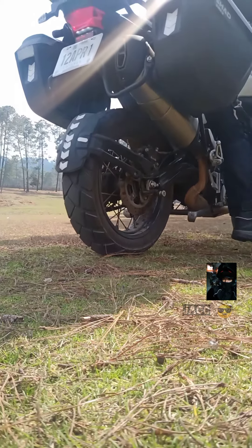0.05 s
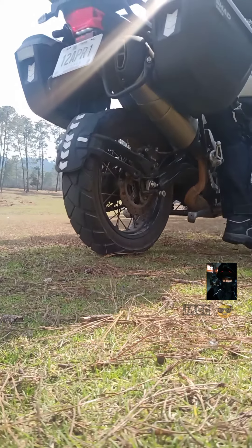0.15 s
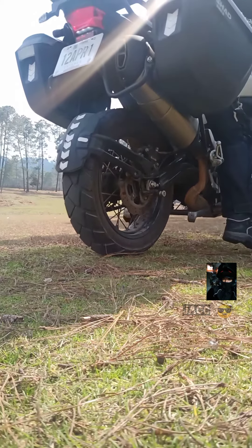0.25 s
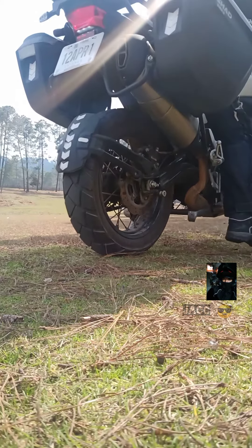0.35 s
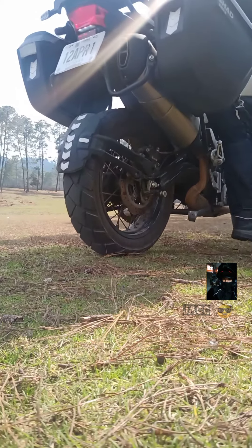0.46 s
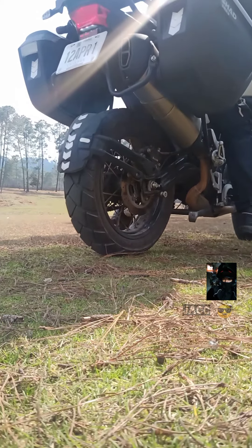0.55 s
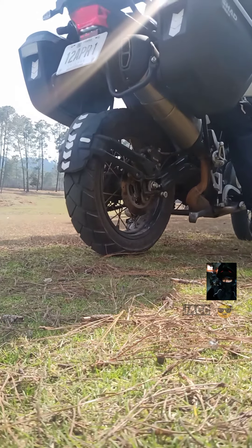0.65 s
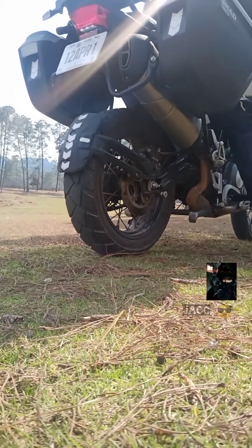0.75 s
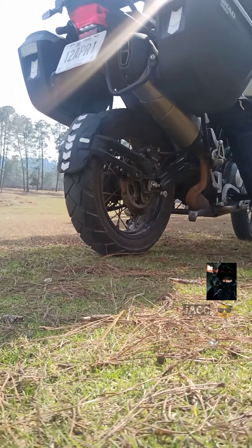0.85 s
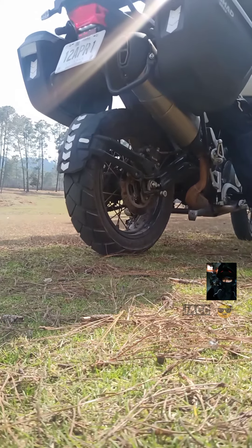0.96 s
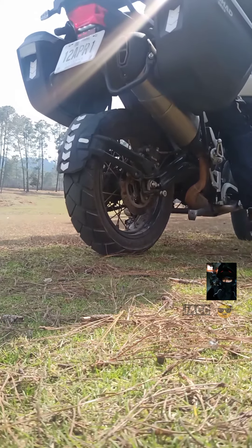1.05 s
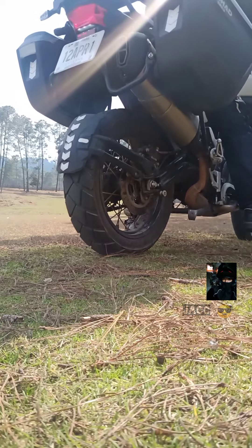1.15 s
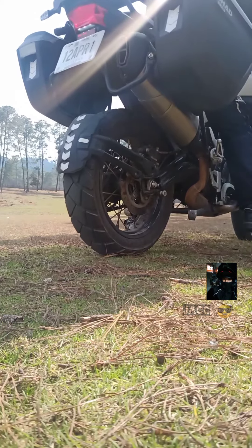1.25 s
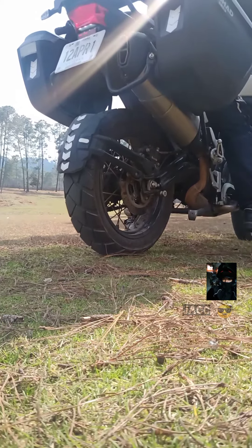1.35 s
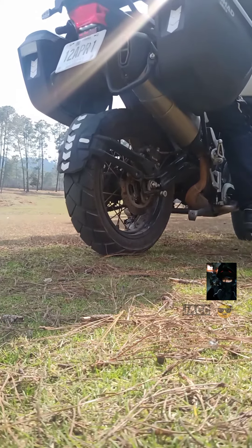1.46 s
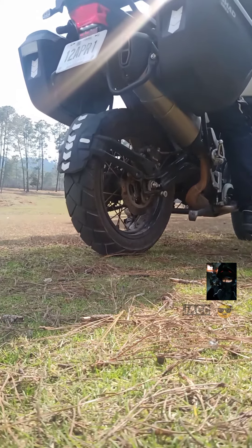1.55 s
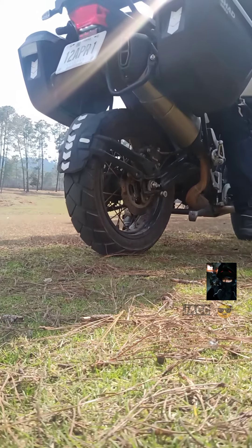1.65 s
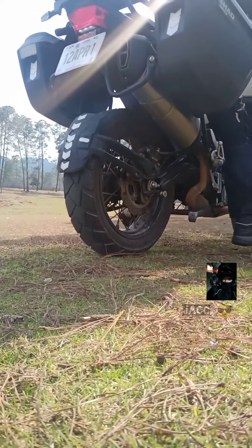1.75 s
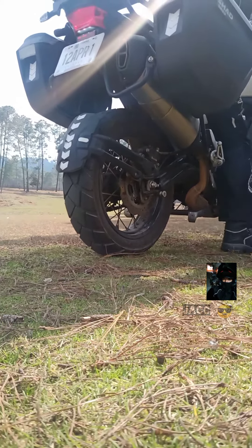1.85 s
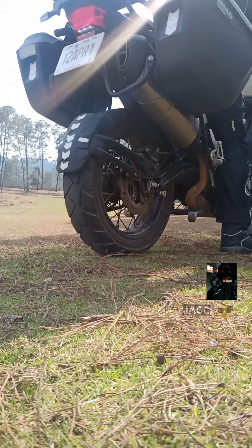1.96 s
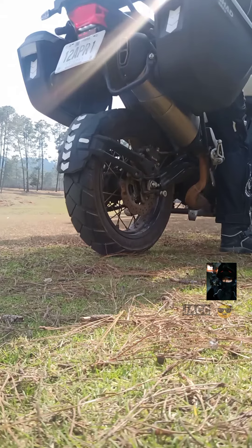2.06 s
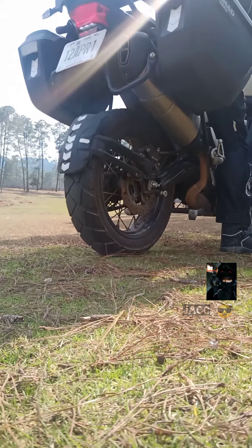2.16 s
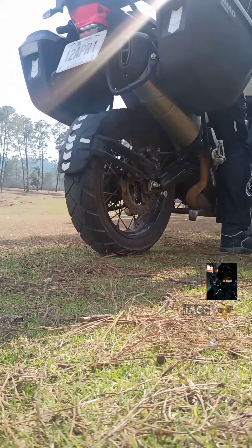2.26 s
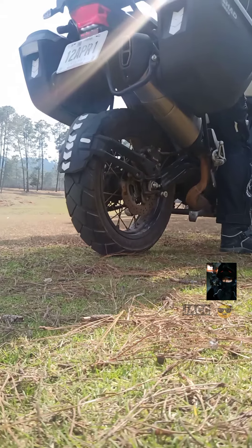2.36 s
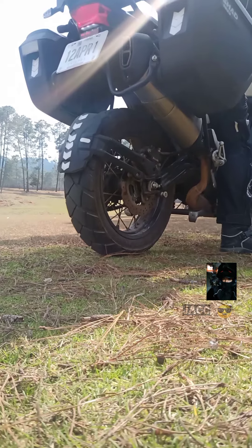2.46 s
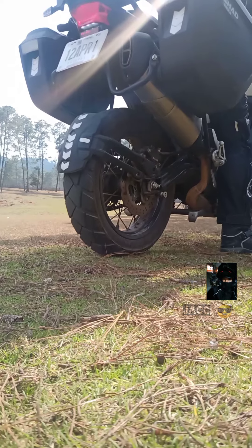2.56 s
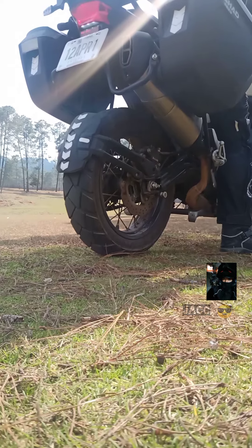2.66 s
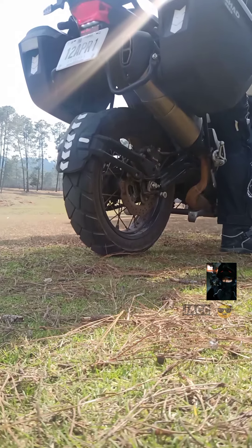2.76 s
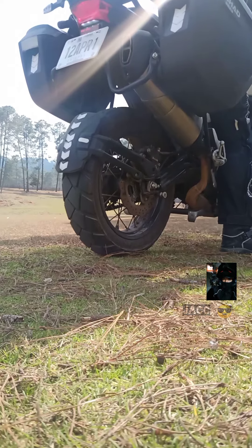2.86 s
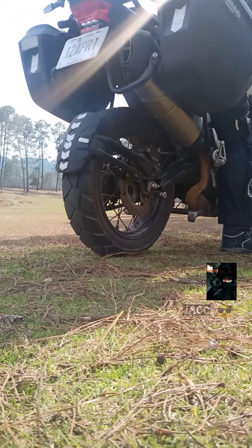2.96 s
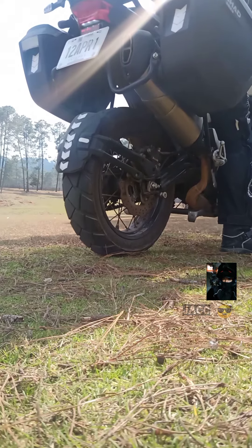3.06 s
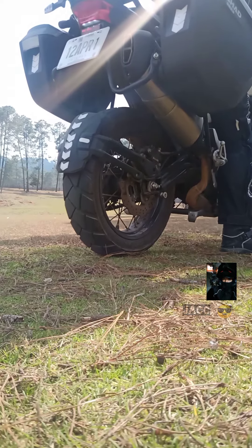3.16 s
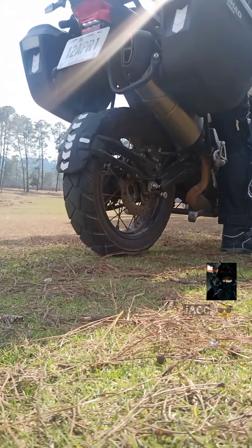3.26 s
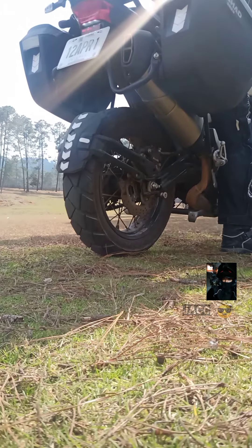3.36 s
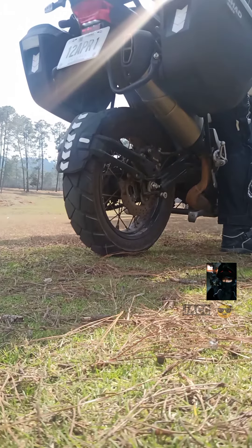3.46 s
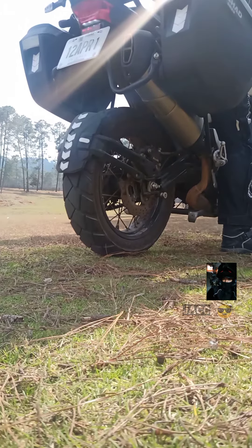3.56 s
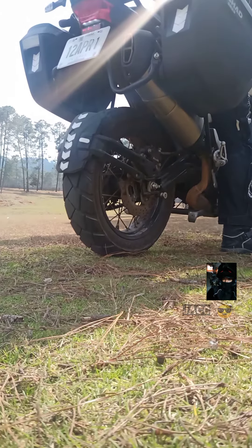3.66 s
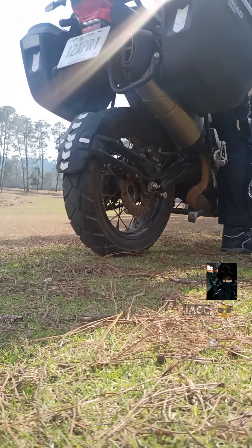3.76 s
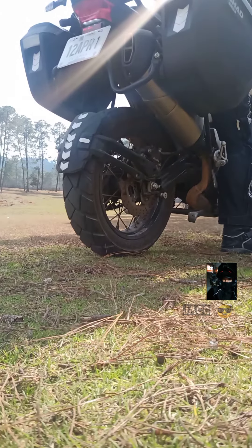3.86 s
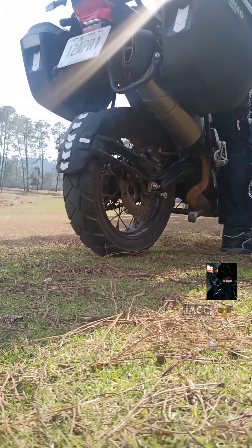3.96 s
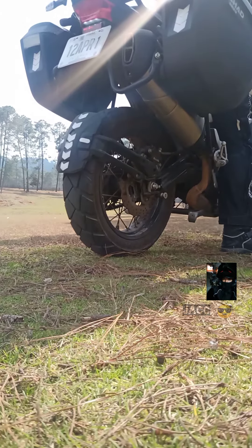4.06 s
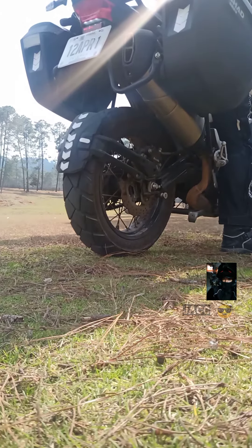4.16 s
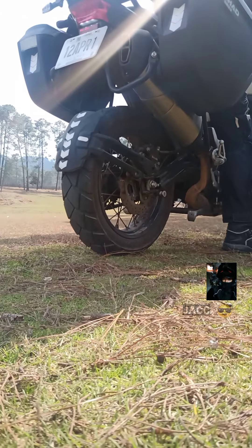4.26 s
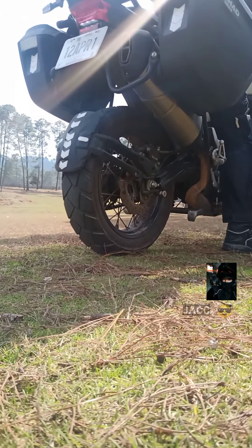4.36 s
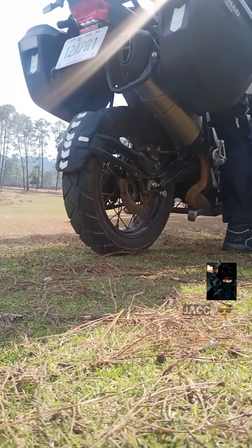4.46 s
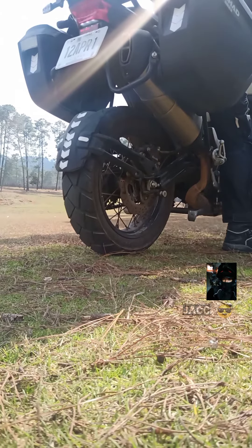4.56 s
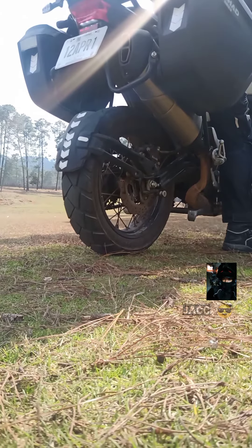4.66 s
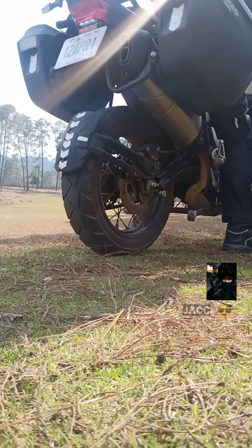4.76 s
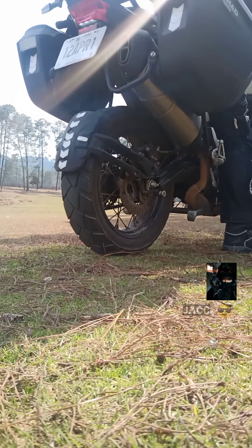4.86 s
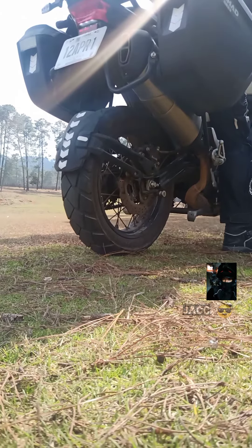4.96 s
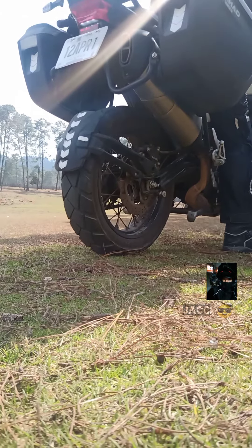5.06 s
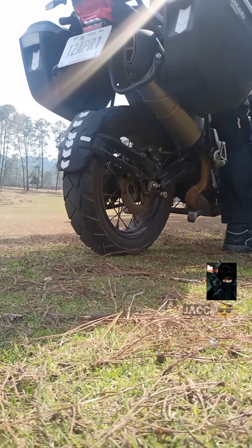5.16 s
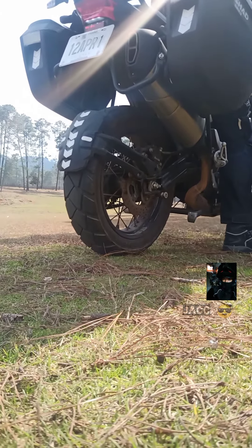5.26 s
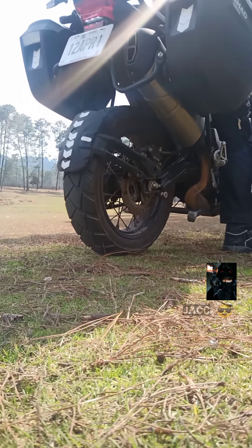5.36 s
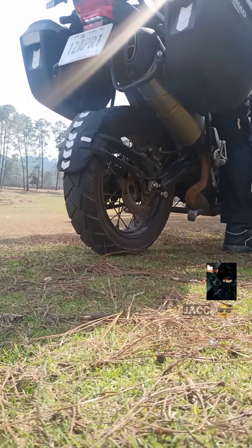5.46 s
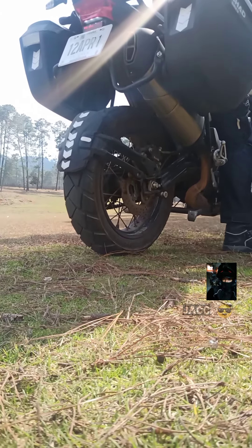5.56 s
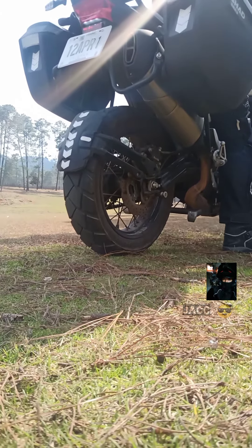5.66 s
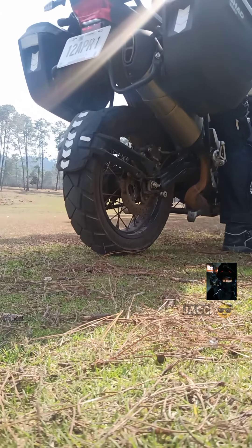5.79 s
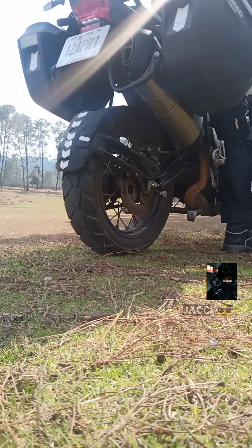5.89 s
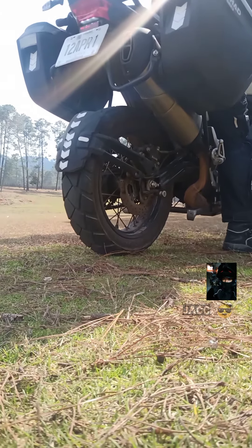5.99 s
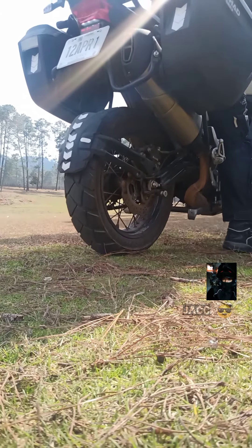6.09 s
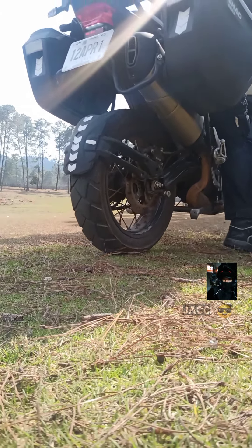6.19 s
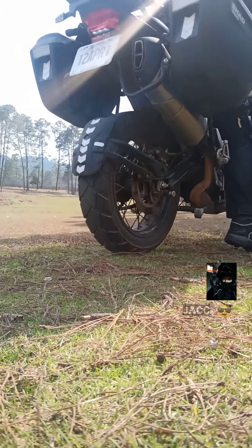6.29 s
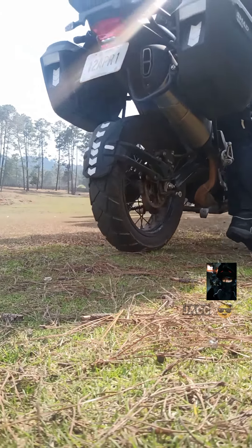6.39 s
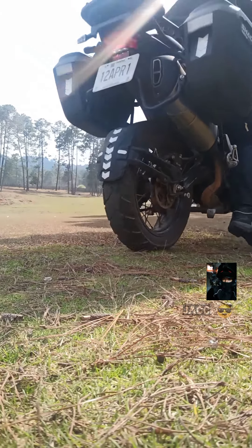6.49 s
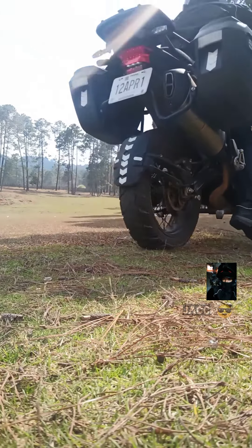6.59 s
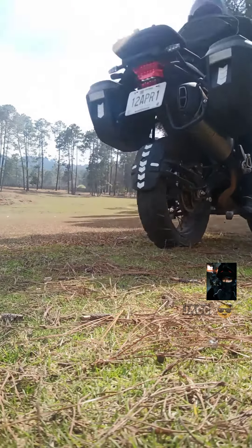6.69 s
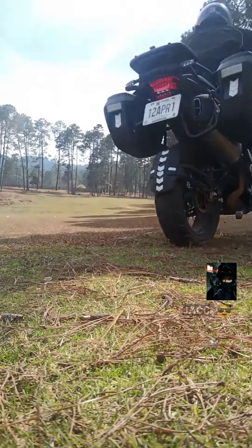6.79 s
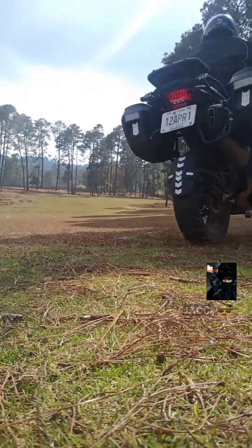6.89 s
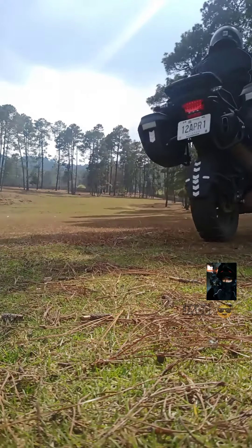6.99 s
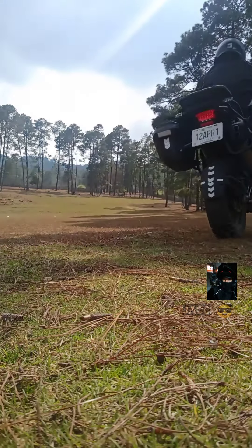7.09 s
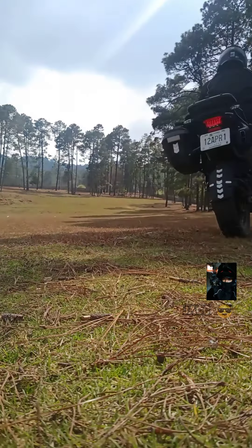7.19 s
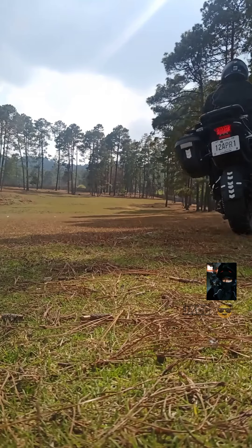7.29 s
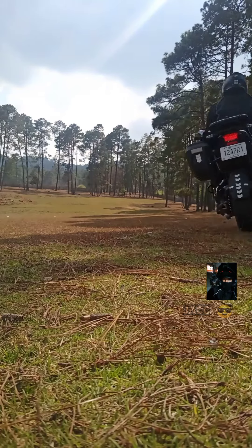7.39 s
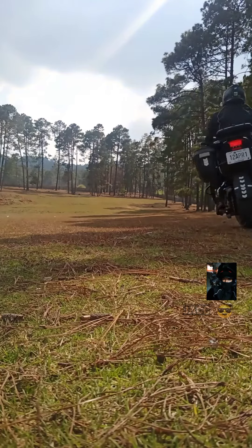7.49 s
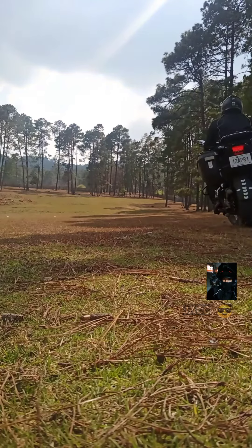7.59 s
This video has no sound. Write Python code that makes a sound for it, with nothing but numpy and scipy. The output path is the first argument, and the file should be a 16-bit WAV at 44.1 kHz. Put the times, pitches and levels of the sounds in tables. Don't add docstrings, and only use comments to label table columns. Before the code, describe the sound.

Lumpy exhaust beats from a heavy motorcycle throb at close range in an open field, with hissy ticks and soft mechanical rush. After about four seconds a loud clunk of lever and gears cuts in, and idling resumes. Near six seconds the beats fuse into a loud growling acceleration, ease briefly, then pull again while moving away, with wind and whipped grass, losing treble and level.

```python
import sys
import numpy as np
from scipy import signal
from scipy.fft import rfft, irfft, next_fast_len
from scipy.io import wavfile
from scipy.ndimage import uniform_filter1d

SR = 44100
rng = np.random.default_rng(int(sys.argv[2]) if len(sys.argv) > 2 else 0)


def rack_gain(trim_db):
    fader = np.asarray(trim_db, float)
    return 10 ** (fader / 20)


def inscribe(sig):
    pcm = np.round(np.clip(np.atleast_2d(sig).T, -1, 1) * 32767)
    wavfile.write(sys.argv[1], SR, pcm.astype(np.int16))


N = 336483

# [first firing t/s, last firing t/s, last thump level/dB, after-puff level/dB]
NEUTRAL_RUNS = [(0.0351, .0364, -31, -35), (0.1088, .1076, -29.5, -63), (0.1821, .2172, -29, -35),
                (0.3277, .3645, -29.5, -35.5), (0.4734, .509, -28.5, -52), (0.617, .6531, -27.5, -52),
                (0.7679, .8045, -29.5, -49), (0.9192, .9551, -27, -34), (1.0628, 1.0983, -28, -52),
                (1.211, 1.2455, -29.5, -43), (1.362, 1.3966, -29.5, -33.5), (1.5077, 1.5432, -26, -52),
                (1.6155, 1.6534, -30.5, -29), (1.7643, 1.804, -31.5, -59), (1.8796, 1.9561, -26.5, -34),
                (2.03, 2.1073, -31, -37.5), (2.2196, 2.2581, -28, -61), (2.333, 2.408, -30.5, -59),
                (2.517, 2.5547, -28.5, -61), (2.665, 2.7025, -27, -32.5), (2.8122, 2.8504, -27.5, -47),
                (2.9227, 2.9988, -25, -56.5), (3.076, 3.3036, -28.5, -63), (3.379, 3.4565, -27.5, -58.5),
                (3.569, 3.6079, -30, -46), (3.6809, 3.754, -26, -64), (3.8281, 3.8659, -27.5, -66),
                (3.976, 4.0119, -28, -28), (4.1239, 4.1598, -26.5, -46.5)]
# [first firing t/s, last firing t/s, last thump level/dB, after-puff level/dB]
GEAR_RUNS = [(4.3147, 4.3507, -25.5, -62), (4.463, 4.497, -27.5, -32.5), (4.6105, 4.645, -28, -56),
             (4.755, 4.7927, -26, -60), (4.905, 4.9418, -26, -53), (5.054, 5.0885, -27.5, -32.5),
             (5.16, 5.193, -28, -24), (5.3434, 5.3822, -27.5, -66), (5.493, 5.5291, -27, -57),
             (5.6396, 5.6743, -24.5, -44), (5.7819, 5.8167, -27, -55), (5.931, 6.0039, -24, -23.5)]
# [level/dB], rows building, last, after-puff
BARK_DB = [-9.5, -13, -13.5]
# [level/dB], rows building, last, after-puff
SPIT_ROLE_DB = [-51.5, -56, -59]
# [t/s, rate/(firings/s)]
FIRING_RATE = [(6.0731, 32.48), (6.167, 39.11), (6.395, 46.81), (6.624, 44.16), (6.675, 45.33),
               (6.99, 39.45), (7.316, 27.92), (7.501, 32.63), (7.63, 34.64)]
# [t/s, loudness level/dB, throttle level/dB]
RIDE = [(6.0731, -19, -5.5), (6.14, -18.5, 1), (6.4, -20.5, 1.5), (6.615, -22, 1), (6.64, -24.5, -21),
        (6.79, -27.5, -8), (6.92, -34, 3), (7.2, -36.5, 1.5), (7.63, -40, 5)]
# [f/Hz, width/Hz, signed strength]
CHAMBERS = [(64.6, 16, .55), (88.6, 15.6, -1)]
# [f/Hz, width/Hz, signed strength]
PIPE = [(118.4, 2.9, 0.03), (156.6, 9.9, -0.032), (180.3, 21.9, 0.16)]
# [f/Hz, width/Hz, signed strength]
HOT_PARTS = [
    [(87, 18.6, -1), (103, 44, 1.05)],
    [(128, 13, 1)],
    [(170, 50, 1), (187, 50, -1)],
]
# [f/Hz, width/Hz, signed strength]
COOL_PARTS = [
    [(88, 10, -1)],
]
# [f/Hz, width/Hz, strength]
PUSH_PARTS = [
    [(44, 30, 1)],
]
# (t/s, thump level/dB)
CLUTCH_BITE = (7.309, -53)
# [f/Hz, width/Hz, level/dB]
TAIL_PIPE = [(290, 92, -7), (328, 81, 4), (403, 70, -8), (657, 50, -13), (740, 280, -4.5), (881, 80, -0.5),
             (1540, 33, -11.5), (2290, 74, -16.5), (2900, 250, -22.5)]
# [f/Hz, width/Hz, level/dB]
GROWL_MODES = [(241.7, 51, 4), (338, 124, 0), (400, 90, -7)]
# [f/Hz, width/Hz, level/dB]
OVERRUN_MODES = [(427, 105, 0)]
# [f/Hz, density level/dB]
SPIT_COLOUR = [(1000, -44.5), (2000, -19.5), (3000, -8.5), (3800, -10.5), (4300, 5.5), (5300, -1),
               (8000, -10.5), (16000, 2)]
# [f/Hz, level/dB]
OUTLET_WHISTLES = [(1550, -10), (2350, -9), (3150, -6.5), (3600, -10.5), (4100, -1), (4600, 0), (5000, 0.5),
                   (5350, -5)]
# [t/s, level/dB]
HARD_SPITS = [(0.0348, -50.5), (.6531, -52), (1.6157, -53.5), (2.0705, -55), (3.075, -53.5), (3.189, -60),
              (4.1224, -52.5), (4.1584, -44), (4.3132, -48.5), (4.757, -47), (5.054, -50), (6.04, -40.5)]
# [t/s, peak level/dB, ring level/dB, t60/s, pitch factor]
KNOCKS = [
    (4.224, -8.5, -22, 0.051, 1.11),
    (4.243, -26, -22, 0.12, .9),
    (4.263, -43, -10, 0.08, 1.3),
    (4.3997, -37, -4, 0.099, 1.014),
]
# [f/Hz, level/dB, t60/s]
LEVER_RINGS = [(1324, -3, 0.078), (1900, -12.5, 0.05), (3330, 6.5, 0.0091), (4680, -10.5, 0.023)]
# [f/Hz, density level/dB]
CLUNK_COLOUR = [(59, -49), (100, 2), (189, 1), (350, -20.5), (570, -12), (736, 1.5), (910, -9),
                (2370, -20.5), (4770, -20.5), (7000, -15), (10000, -19), (16000, -15.5)]
# [t/s, level/dB]
DOG_BLOWS = [(4.2252, -24), (4.2273, -20), (4.2316, -26), (4.2346, -23), (4.2375, -24), (4.2403, -27)]
# [t/s, level/dB, t60/s]
STAND_SCRAPES = [
    (.4445, -50, .09),
    (.452, -63, 0.092),
]
# [f/Hz, density level/dB]
SCRAPE_COLOUR = [(500, -34), (1300, -1), (2500, -3), (3400, -2), (4800, -8), (6200, -4), (16000, -17)]
# [f/Hz, density level/dB]
RUSH_COLOUR = [(24, -36), (45, -12), (69, -14), (96, -14), (185, -20), (237, -30), (290, -32), (380, -36),
               (542, -45), (810, -40), (1150, -47), (1590, -46), (2570, -62), (4680, -52), (16000, -72)]
# [f/Hz, density level/dB]
GRASS_COLOUR = [(200, -30.5), (350, 8.5), (540, 2), (850, 3.5), (2500, -9), (5200, -16), (7000, 4.5),
                (16000, -2)]
# [f/Hz, density level/dB]
BLADES_COLOUR = [(200, -20.5), (350, 8.5), (1200, 5.5), (3500, -9), (5200, -3.5), (6500, 2.5), (9000, -6),
                 (16000, -7.5)]
# [t/s, level/dB]
ROLLING = [(6.1, -90), (6.9, -63.5), (7.63, -70)]
# [t/s, extra delay/ms, strength]
GROUND_ECHO = [(6.0, 0.49, 0.13), (6.35, 0.51, 0.084), (6.7, 0.36, 0.37), (7.0, 0.366, 0.28),
               (7.63, .34, 0.087)]
# [f/Hz, level/dB]
PORT = [(5400, 0), (5900, -12.5), (6400, -14.5), (7000, -24), (8200, -36.5), (13000, -29), (14200, -27.5),
        (15200, -9), (15850, -22.5), (16100, -57)]
# [f/Hz, density level/dB]
HISS_COLOUR = [(600, -19), (1200, 1.5), (6000, -13.5), (9000, -13.5), (16000, -16.5)]
CHANGE_S = [
    4.2128,
    4.2155,
    4.2225,
    4.30,
]

SLOT_S = 0.0365
TURN_S, SHADE_DB_PER_S, BLUR_DB_PER_S = 7.02, 47, 16
RESONANT_RATE = 49


def unit(x):
    return x / np.sqrt(np.mean(x ** 2) + 1e-20)


def curves(rows):
    s, *cols = np.transpose(rows)
    return [np.interp(np.arange(N) / SR, s, c) for c in cols]


def filtered(x, response):
    m = next_fast_len(len(x) + SR // 2)
    return irfft(rfft(x, m) * response(np.fft.rfftfreq(m, 1 / SR)), m)[:len(x)]


def colour(points):
    f, db = np.transpose(points)
    return lambda hz: rack_gain(np.interp(np.log(hz + 1), np.log(f), db))


def resonances(modes):
    def response(f):
        total = 0
        for k, (centre_hz, width_hz, db) in enumerate(modes):
            damping = 1j * f * width_hz
            total = total + (-1) ** k * rack_gain(db) * damping / (centre_hz ** 2 - f * f + damping)
        return total
    return response


def noise(response):
    return unit(filtered(rng.standard_normal(N), response))


def struck(s, db, shape):
    train = np.bincount(np.round(s * SR).astype(int), rack_gain(db), N)[:N]
    return signal.fftconvolve(train, shape)[:N]


def burst(rise_s, t60_s):
    t = np.arange(SR // 5) / SR
    return (1 - np.exp(-t / rise_s)) * rack_gain(-60 * t / t60_s)


def grains(s, db, hz, t60_s, rise_s):
    t = np.arange(SR // 12) / SR
    decay = rack_gain(db[:, None] - 60 * t / t60_s[:, None])
    rings = decay * (1 - np.exp(-t / rise_s)) * np.sin(2 * np.pi * hz[:, None] * t)
    where = np.round(s * SR).astype(int)[:, None] + np.arange(len(t))
    return np.bincount(where.ravel(), rings.ravel(), N + SR)[:N]


def idle_firings():
    build_db, seesaw_db = 4, 2
    building, last_one, after_puff = 0, 1, 2
    rows = []
    for first_s, last_s, db, after_db in NEUTRAL_RUNS + GEAR_RUNS:
        count = round((last_s - first_s) / SLOT_S) + 1
        to_go = np.arange(count)[::-1]
        if count < 4:
            thump_db = db - build_db * (to_go > 0) * (count - 1) ** 0.77
        else:
            thump_db = db - seesaw_db * (-1) ** (to_go + 1)
        for s, level_db, left in zip(np.linspace(first_s, last_s, count), thump_db, to_go):
            rows.append((s, level_db, building if left else last_one))
        rows += [(last_s + SLOT_S, after_db, after_puff), (last_s + 2 * SLOT_S, -80, after_puff)]
    s, thump_db, role = np.transpose(rows)
    role = role.astype(int)
    bark_scatter_db, spit_scatter_db = (rng.standard_normal((len(s), 2)) * [1.8, 2.5]).T
    sharp_db = thump_db + 10.5 * (s > 5.98)
    bark_db = 0.73 * thump_db + 0.3 * sharp_db + np.take(BARK_DB, role) + bark_scatter_db
    spit_db = sharp_db + 31 + np.take(SPIT_ROLE_DB, role)
    spit_db = np.maximum(spit_db, -66.5) + spit_scatter_db
    return s, thump_db, bark_db, spit_db


def ride_firings():
    rate = curves(FIRING_RATE)[0]
    start_s = FIRING_RATE[0][0]
    turns = np.cumsum(rate[round(start_s * SR):]) / SR
    s = start_s + np.searchsorted(turns, np.arange(int(turns[-1]) + 1)) / SR
    at_firing = np.round(s * SR).astype(int)
    loud_db, throttle_db, rate = np.array([*curves(RIDE), rate])[:, at_firing]
    shade_db = -SHADE_DB_PER_S * np.maximum(s - TURN_S, 0)
    drone_db = -11 - 0.5 * np.abs(rate - RESONANT_RATE)
    throat_db = 0.33 * shade_db + 0.52 * (rate - RESONANT_RATE) - 25
    layers_db = [0 * s, drone_db, throttle_db - 3.5, throat_db, shade_db - 20]
    scatter_db = rng.standard_normal((len(s), 5)) * [0.5, 0.8, 1.1, 1.5, 2.2]
    return s, *(loud_db + layers_db + scatter_db.T)


def exhaust(s, levels_db, parts, leak_db):
    t = np.arange(SR // 6) / SR
    puff = np.diff(t * np.exp(-t / 0.0007), prepend=0)
    sound = 0
    for db, modes in zip(levels_db, parts):
        ring = sum(g * np.sin(2 * np.pi * hz * t) * np.exp(-np.pi * width_hz * t)
                   for hz, width_hz, g in modes)
        ring = signal.fftconvolve(ring, puff)[:len(t)]
        sound = sound + struck(s, db, ring / ring.max())
    return filtered(sound, lambda hz: 1 / np.sqrt(1 + (hz / 225) ** 12) + rack_gain(leak_db))


def throat(s, db, edge_db, low_db):
    modes = resonances(TAIL_PIPE)

    def pipe(hz):
        return modes(hz) * np.abs(modes(hz)) ** 1.1

    edge = filtered(struck(s + 0.0034, db + edge_db, np.ones(1)), pipe)
    turbulence = noise(lambda hz: pipe(hz) * rack_gain(np.where(hz < 540, low_db, 0)))
    return edge + struck(s + 0.00024, db, burst(0.0011, 0.11)) * turbulence


def growl(s, db, modes):
    response = resonances(modes)
    fronts = struck(s + 0.00301, 0 * s, np.ones(1))
    fronts = filtered(fronts, lambda hz: response(hz) * np.abs(response(hz)))
    return rack_gain(db - 3.5) * fronts / np.std(fronts[round(s[0] * SR):])


def spit(s, spit_db, life):
    crack = burst(0.0016, 0.018) * 1.7
    hiss = struck(s + 0.00026, spit_db, burst(0.0044, 0.048) + crack) * noise(colour(SPIT_COLOUR))
    draw = rng.random((len(s), len(OUTLET_WHISTLES), 4))
    outlet_hz, outlet_db = np.transpose(OUTLET_WHISTLES)
    hz = outlet_hz * (0.95 + 0.1 * draw[..., 0])
    level_db = spit_db[:, None] + outlet_db + 7 - 24 * draw[..., 1]
    late_s = s[:, None] + 0.001043 + 0.0046 * draw[..., 2] ** 3
    t60_s = np.reshape(life, (-1, 1)) * (0.023 + 0.017 * draw[..., 3])
    return hiss + grains(late_s.ravel(), level_db.ravel(), hz.ravel(), t60_s.ravel(), rise_s=0.0019)


def gearbox():
    s, db, ring_db, t60_s, pitch = np.transpose(KNOCKS)
    clatter = sum(struck(s[k:k + 1], db[k:k + 1] - 10, burst(0.003, t60_s[k])) for k in range(len(s)))
    clatter = clatter * noise(colour(CLUNK_COLOUR))
    steel = sum(grains(s, db + ring_db + level_db, hz * pitch, ring_s + 0 * s, rise_s=0.001)
                for hz, level_db, ring_s in LEVER_RINGS)
    t = np.arange(SR // 50) / SR
    blow = -np.sin(2 * np.pi * 330 * t) * rack_gain(-60 * t / 0.011)
    return clatter + steel + struck(*np.transpose(DOG_BLOWS), blow)


def side_stand():
    scrape = sum(struck(np.array([s]), [db], burst(0.0012, t60_s)) for s, db, t60_s in STAND_SCRAPES)
    ping_db, ping_hz = np.array([-47, -54, -52]), np.array([2450, 1850, 4650])
    ping = grains(np.full(3, STAND_SCRAPES[0][0]), ping_db, ping_hz, np.full(3, 0.04), rise_s=0.001)
    return scrape * noise(colour(SCRAPE_COLOUR)) + ping


def engine_rush():
    z = signal.stft(rng.standard_normal(N + 999), nperseg=512)[2]
    field = uniform_filter1d(uniform_filter1d(rng.standard_normal(z.shape), 3, 0), 5, 1)
    patchy = signal.istft(z * rack_gain(4.2 * unit(field)), nperseg=512)[1][:N]
    draw = rng.random((90, 4))
    hz = np.choose((draw[:, 1] * 4).astype(int), [893, 910, 1194, 1500]) * (0.82 + 0.11 * draw[:, 2])
    whines = grains(draw[:, 0] * N / SR, -62 - 9 * draw[:, 3], hz, 0.3 + 0 * hz, rise_s=0.012)
    away_db = np.interp(np.arange(N) / SR, [6.7, 7.2], [0, -8])
    return rack_gain(away_db - 50) * unit(filtered(patchy, colour(RUSH_COLOUR))) + whines


def riding_rush(s):
    moving_db = 0.24 * curves(RIDE)[0] - 44
    moving_db = moving_db + np.interp(np.arange(N) / SR, [5.85, 6.04, 6.2], [-25, -4, 0])
    uneven_db = rng.normal(0, 3, len(s)) - BLUR_DB_PER_S * np.maximum(s - TURN_S, 0)
    pulsing = 0.5 + struck(s + 0.0025, 14.5 + uneven_db, burst(0.0022, 0.019))
    wind = rack_gain(moving_db) * pulsing * noise(colour(GRASS_COLOUR))
    return wind + rack_gain(curves(ROLLING)[0]) * np.sqrt(pulsing) * noise(colour(BLADES_COLOUR))


def ground(x):
    delay_ms, strength = curves(GROUND_ECHO)
    dull = filtered(x, lambda hz: 1 / (1 + (hz / 7500) ** 6))
    mirror = np.interp(np.arange(N) - delay_ms * SR / 1000, np.arange(N), dull)
    return x + np.clip(strength, 0, 1) * mirror


def idling():
    s, thump_db, bark_db, spit_db = idle_firings()
    beats = exhaust(s, [thump_db, bark_db], [CHAMBERS, PIPE], leak_db=-30)
    beats = beats + throat(s, thump_db - 36, edge_db=22.5, low_db=-9.5) + spit(s, spit_db, life=0.91)
    ticks = spit(rng.random(70) * FIRING_RATE[0][0], rng.normal(-67, 4.9, 70), life=0.83)
    return beats + ticks + spit(*np.transpose(HARD_SPITS), life=0.9)


def riding(s, thump_db, drone_db, bark_db, pull_db):
    lead_s = 0.0016
    ride = exhaust(s - lead_s, [thump_db, drone_db, bark_db], HOT_PARTS, leak_db=-17)
    ride = ride + throat(s - lead_s, pull_db + 4, edge_db=45, low_db=-12)
    ride = filtered(ride, lambda hz: 1 - 0.75 * np.exp(-((hz - 530) / 70) ** 2))
    cool = np.interp(s, [6.85, 7.1], [0, 1])
    ride = ride + exhaust(s - lead_s, [thump_db - 42 + 27 * cool], COOL_PARTS, leak_db=-40)
    ride = ride + exhaust(s, [thump_db - 22.5 - 9 * cool], PUSH_PARTS, leak_db=-38.5)
    ride = ride + exhaust(np.array(CLUTCH_BITE[:1]), [CLUTCH_BITE[1:]], [CHAMBERS], leak_db=-29)
    loud_db, throttle_db = curves(RIDE)
    ride = ride + growl(s, loud_db + 0.4 * throttle_db - 21.5, GROWL_MODES)
    return ride + growl(s, loud_db - 0.71 * throttle_db - 37, OVERRUN_MODES)


def scene():
    s, thump_db, drone_db, bark_db, pull_db, spit_db = ride_firings()
    flutter = spit(s + 0.014, spit_db - 12.5, life=1.0)
    singing = np.interp(s, [6.5, 6.7], [0.55, 1.3])
    front = spit(s + 0.0018, spit_db + 0.3, life=singing)
    air = ground(front + flutter + engine_rush() + riding_rush(s))
    engine = idling() + riding(s, thump_db, drone_db, bark_db, pull_db) + air
    engine = filtered(engine, colour(PORT))
    t = np.arange(N) / SR
    drop_s, blip_s, return_s, full_s = CHANGE_S
    engine *= np.where(t < drop_s, 1, np.clip((t - return_s) / (full_s - return_s), 0, 1))
    blip_colour = colour(CLUNK_COLOUR[:-1] + [(15800, -24), (16200, -60)])
    blip = rack_gain(-47) * np.exp(-((t - blip_s) / 0.0013) ** 2) * noise(blip_colour)
    metal = filtered(gearbox() + side_stand(), colour(PORT))
    hiss = rack_gain(-86.5) * noise(colour(HISS_COLOUR))
    return (engine + metal + blip + hiss)[None]


def top_cut(x):
    return signal.sosfilt(signal.butter(12, 17150, fs=SR, output="sos"), x)


def record(dry):
    return top_cut(dry)


dry = scene()
out = record(dry)
inscribe(out)
```